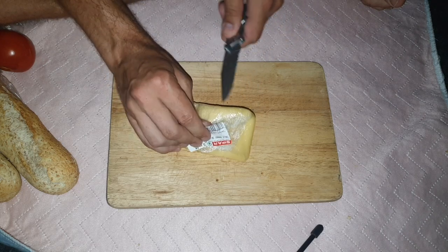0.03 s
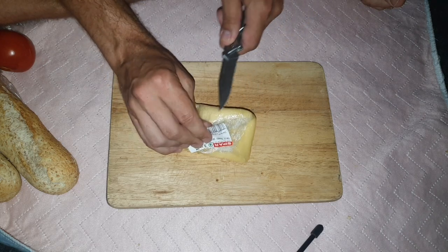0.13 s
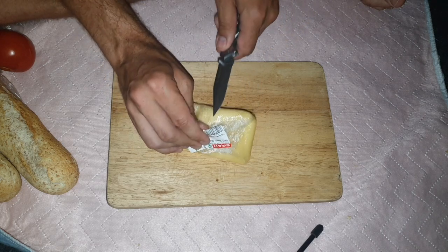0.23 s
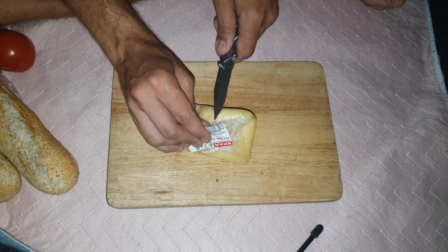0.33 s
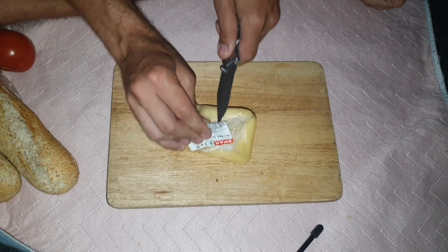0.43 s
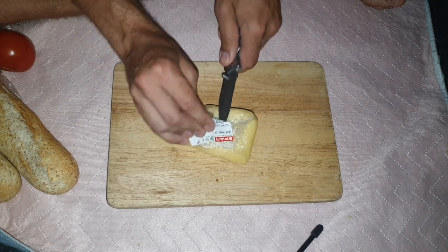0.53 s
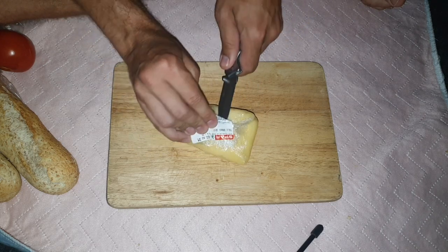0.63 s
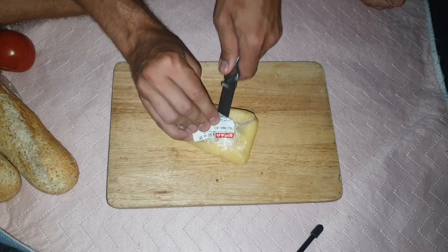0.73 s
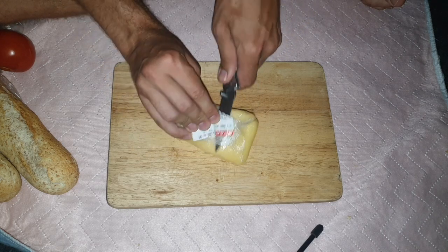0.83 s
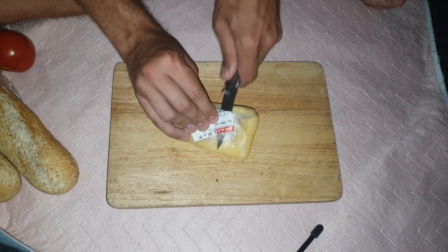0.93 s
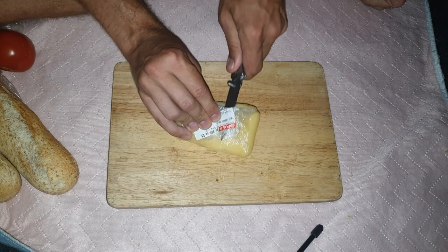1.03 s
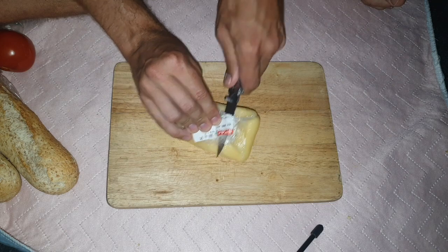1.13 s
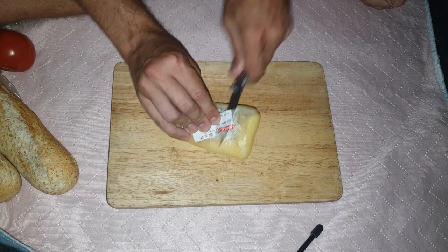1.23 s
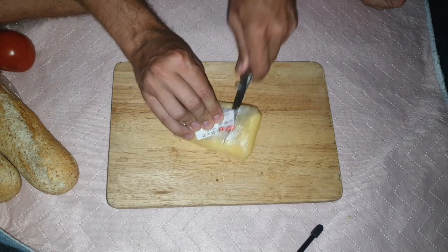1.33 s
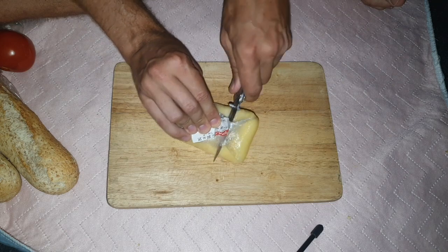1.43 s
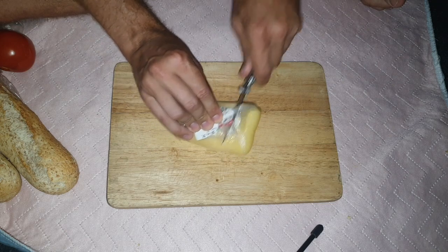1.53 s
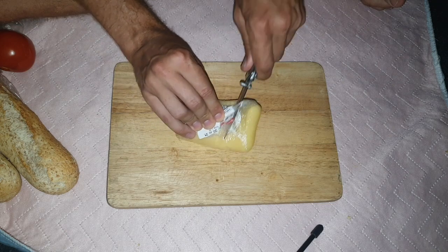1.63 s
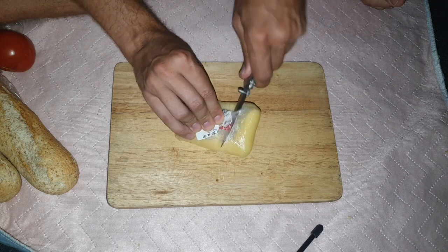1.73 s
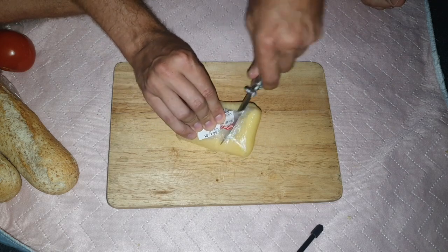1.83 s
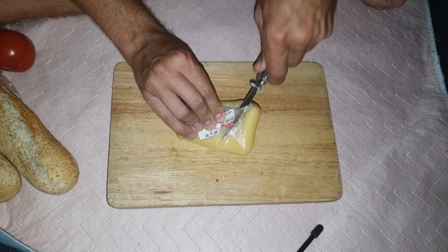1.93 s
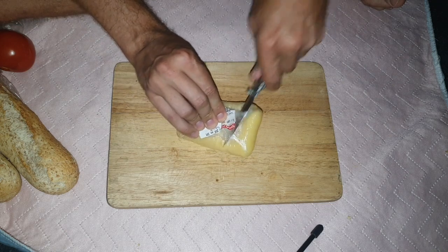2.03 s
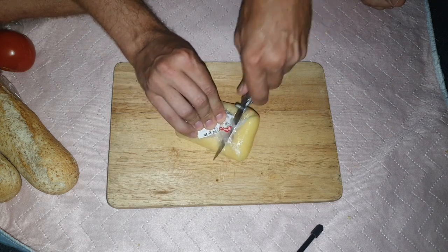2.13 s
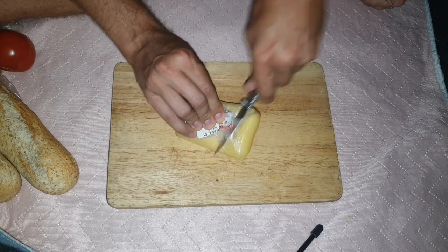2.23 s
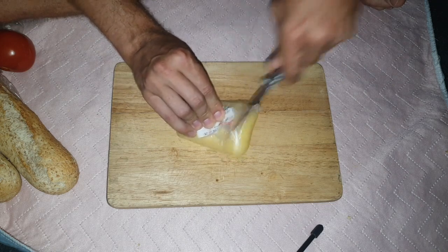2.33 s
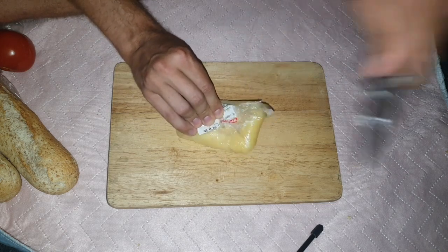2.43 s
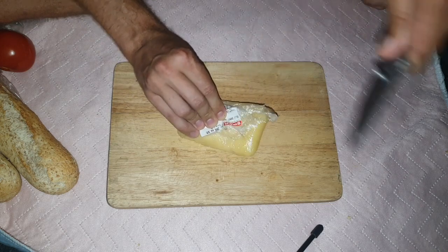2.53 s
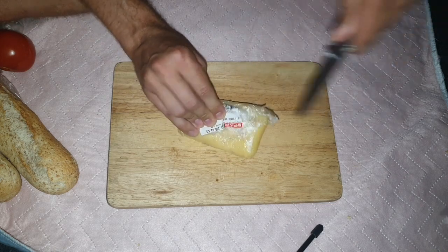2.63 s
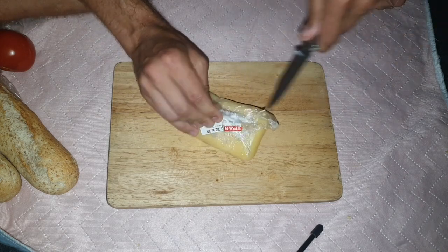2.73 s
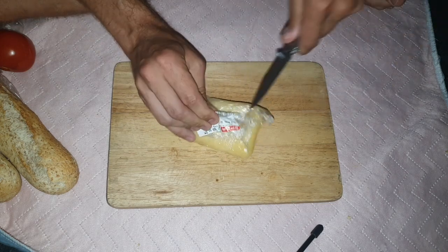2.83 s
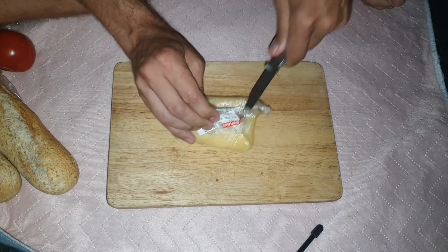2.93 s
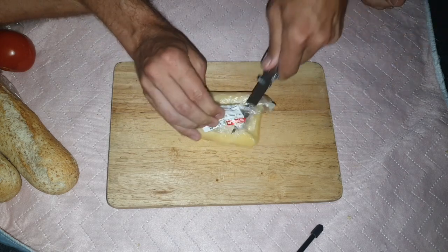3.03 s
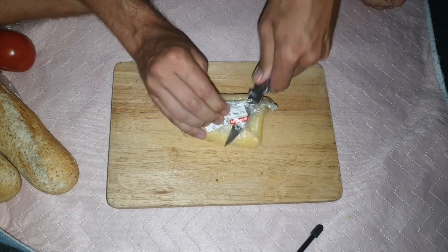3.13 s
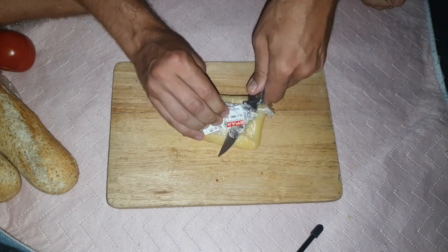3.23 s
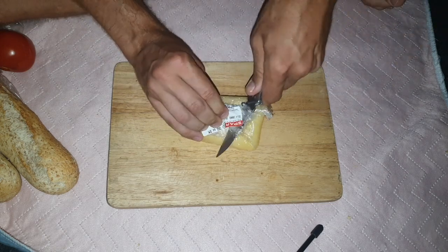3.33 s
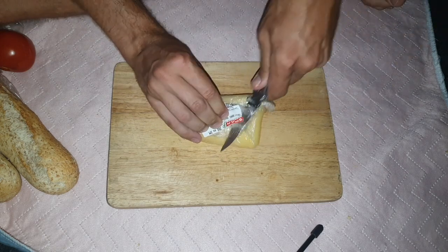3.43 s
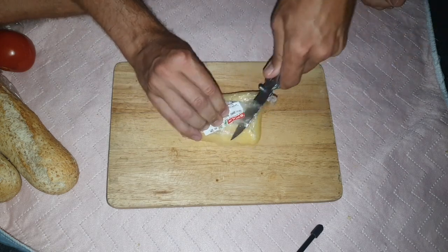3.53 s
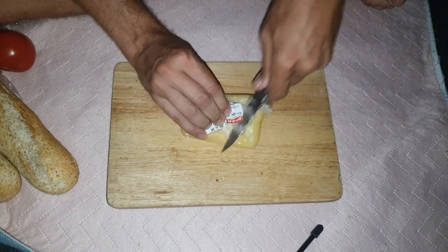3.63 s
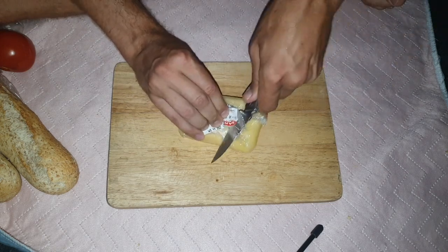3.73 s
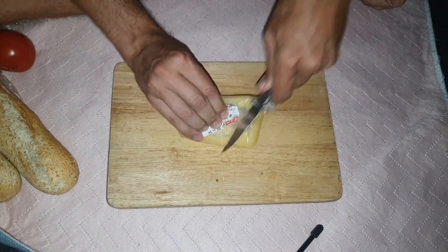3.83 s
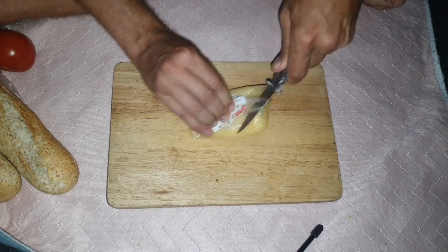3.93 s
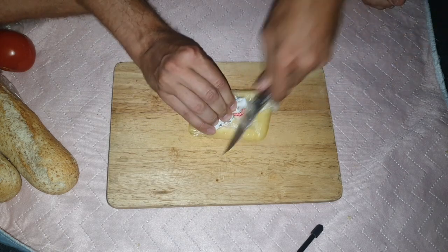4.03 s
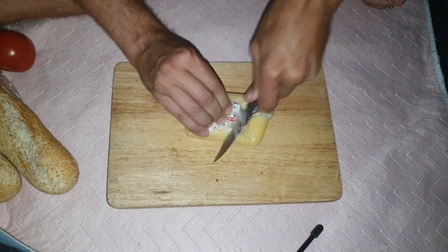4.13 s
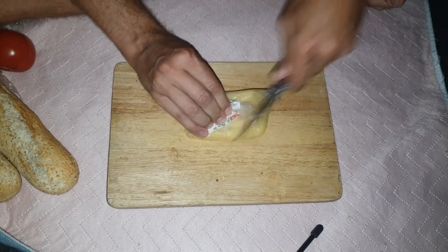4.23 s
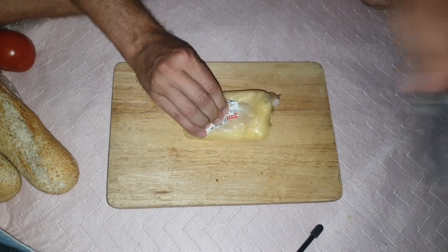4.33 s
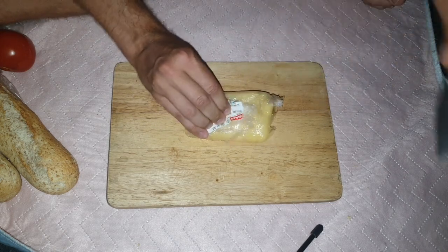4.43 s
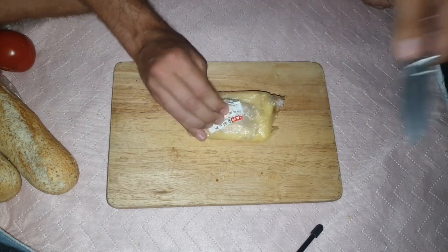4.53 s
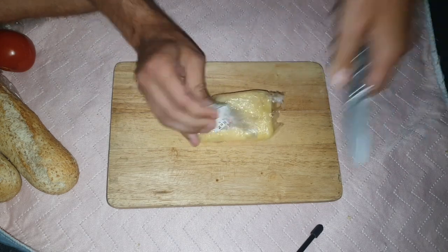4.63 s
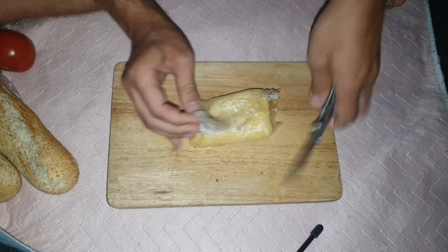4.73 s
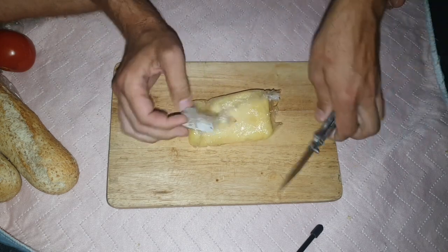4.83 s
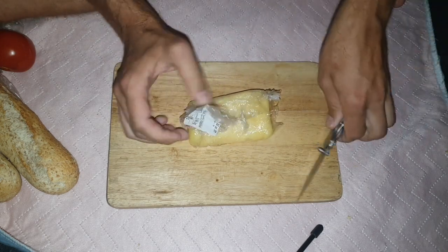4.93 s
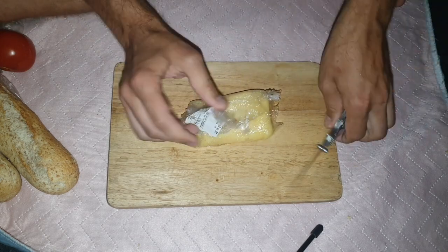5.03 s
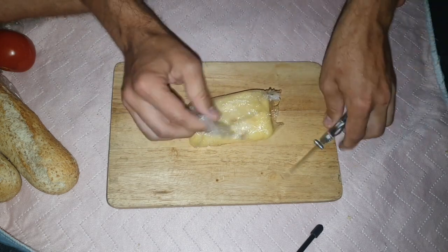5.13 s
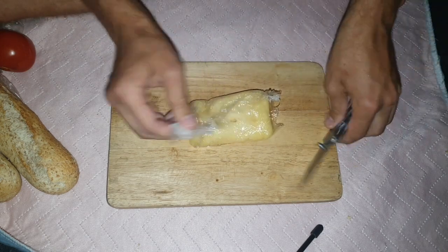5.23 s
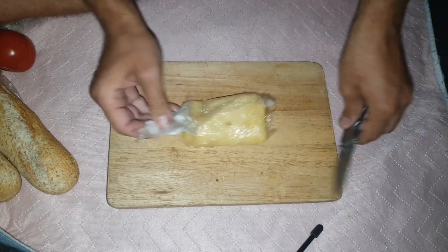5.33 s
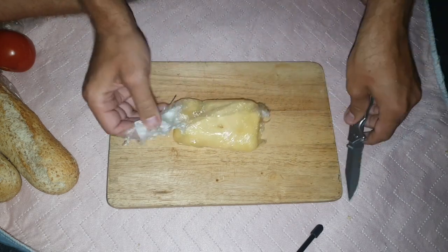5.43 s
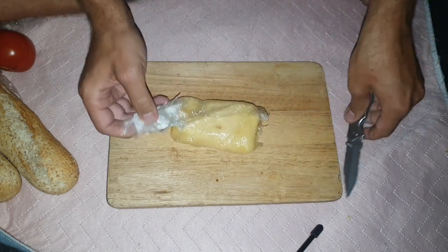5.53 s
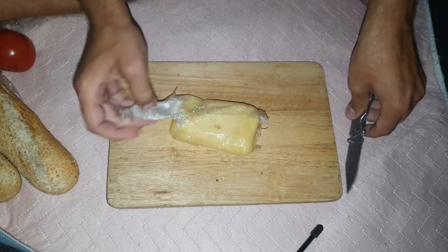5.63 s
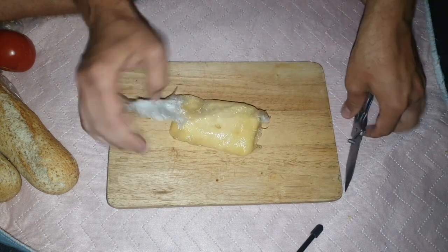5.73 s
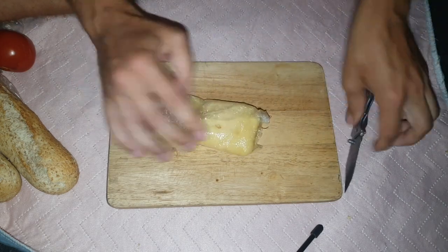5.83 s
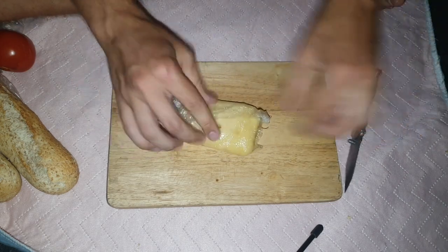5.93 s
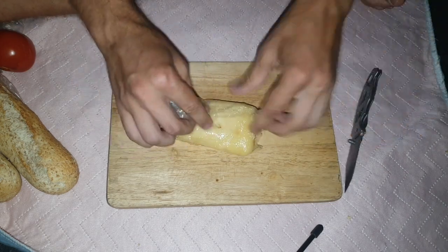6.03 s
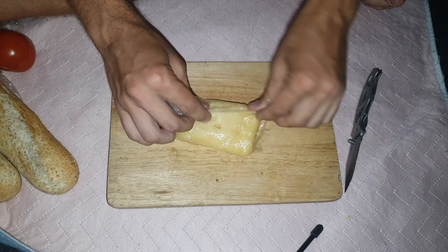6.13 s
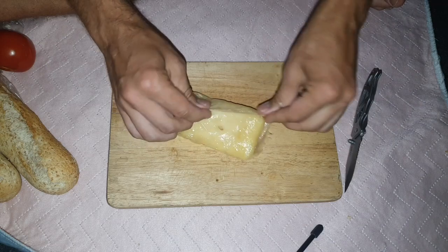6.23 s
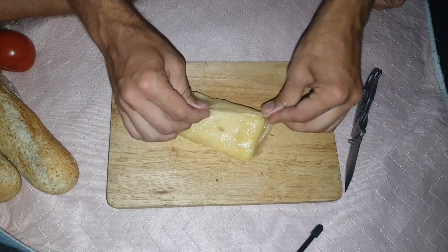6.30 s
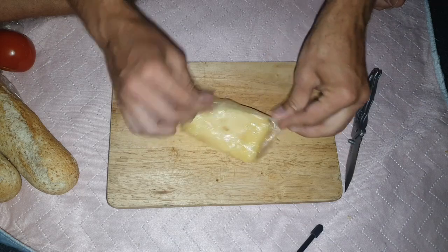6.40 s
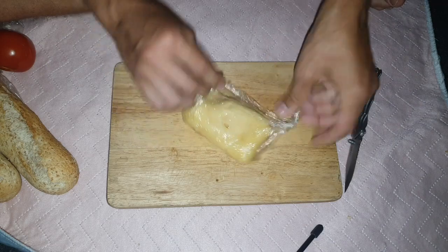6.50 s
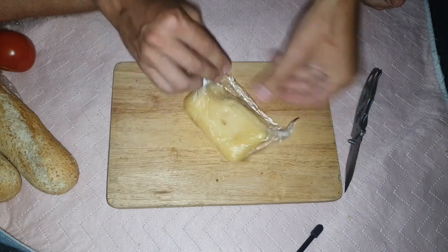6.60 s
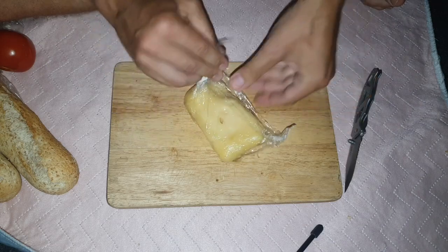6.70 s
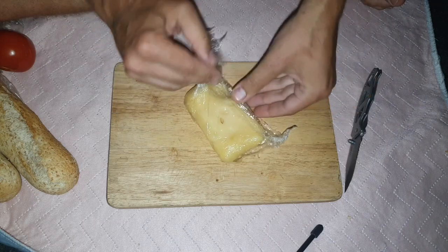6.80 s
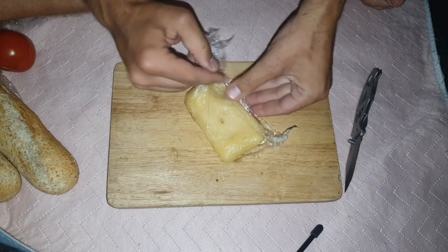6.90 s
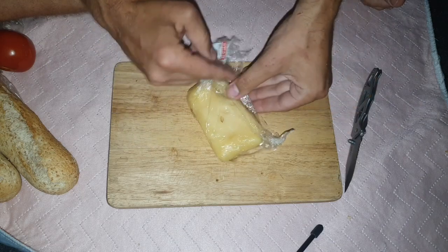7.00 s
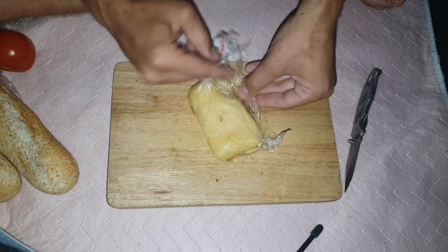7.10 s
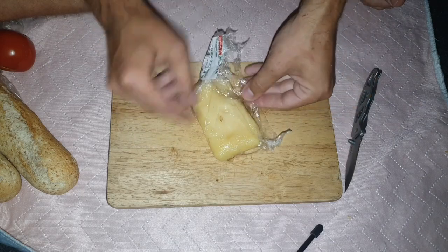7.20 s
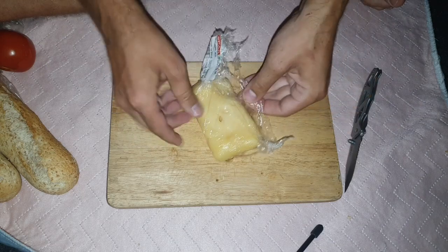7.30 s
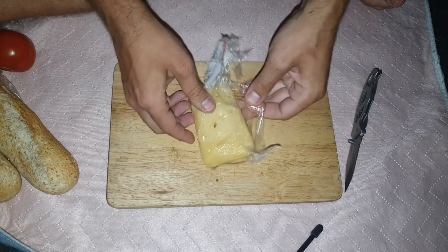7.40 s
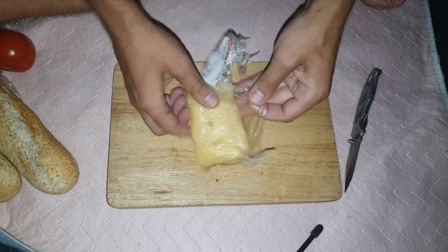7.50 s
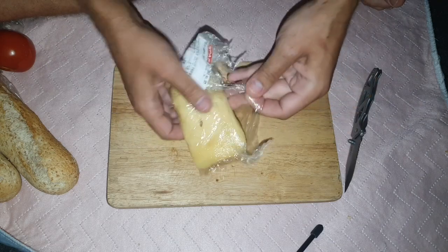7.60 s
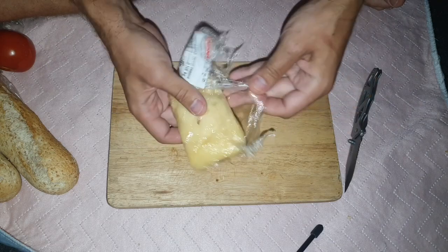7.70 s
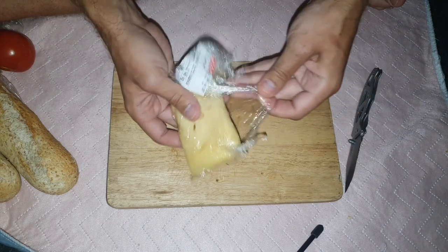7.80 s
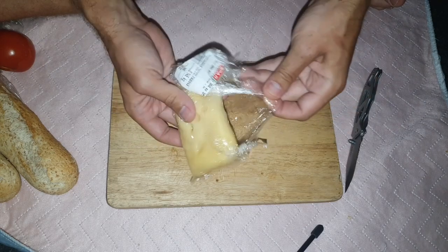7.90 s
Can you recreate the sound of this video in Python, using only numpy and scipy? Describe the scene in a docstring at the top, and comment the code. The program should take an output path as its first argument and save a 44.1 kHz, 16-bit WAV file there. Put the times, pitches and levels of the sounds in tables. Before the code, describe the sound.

Inside a parked car with a constant low rumble, a knife works at plastic wrap on cheese, close to the microphone. Faint scrapes, crisp ticks and hissy crinkles lead to two short, loud rips, each with a dull boom. A few quick knocks of the knife tip on a wooden board follow. Then gentler rustling continues as fingers pull the wrap off, and the cheese tips over with a soft scuff.

```python
"""Cling film rustles, crackles and hisses as a knife slits it and fingers peel it off a piece of cheese.
Single creases snap as they flip over, and twice the blade rips through the tight film. Later the knife
tip clatters on the wooden board, and the cheese tips over with a soft scuff. All this is in a parked car:
the small cabin adds short echoes, booms low when the board is jolted and rumbles all the while."""
import sys
import numpy as np
from scipy import signal
from scipy.fft import rfft, irfft, next_fast_len
from scipy.io import wavfile
from scipy.ndimage import map_coordinates

SR = 44100
rng = np.random.default_rng(int(sys.argv[2]) if len(sys.argv) > 2 else 0)


def write(x):
    x = np.atleast_2d(x).T
    wavfile.write(sys.argv[1], SR, np.round(np.clip(x, -1, 1) * 32767).astype(np.int16))


N = 350947
TIME = np.arange(N) / SR

# The tone of each noise, from bass to treble. Each row: frequency in Hz, boost or cut in dB.
RUMBLE_TONE = [(20, -9.5), (40, -8.5), (61, 1), (80, -5.5), (115, -18.5), (160, -12.5), (215, -21),
               (280, -23), (340, -31.5), (620, -34), (950, -30.5), (1400, -38), (2500, -54), (3400, -37.5),
               (4500, -55), (15000, -72.5)]
SCUFF_TONE = [(100, -1), (280, -17), (430, 0), (600, -17), (1000, -20), (2000, -34), (8000, -57)]
RUB_TONE = [(200, -16.5), (450, 3), (1000, 1.5), (1800, 0), (3000, -8), (6000, -20.5), (16000, -39)]
CRACKLE_TONE = [(500, -41), (1500, -13.5), (2300, -6.5), (3100, 2.5), (3700, 1), (4400, -7), (6200, -11.5),
                (7500, -19.5), (16000, -41)]
HISS_TONE = [(500, -13), (1500, -1), (2200, -1.5), (3500, 4), (6200, 2), (7600, -1), (9300, 0.5),
             (12000, -1.5), (15800, -8)]
RIP_TONE = [(300, -8), (800, -4.5), (1400, -5), (2200, -0.5), (3500, 0.5), (5500, -1), (7500, -6),
            (10000, -6.5), (15800, -12.5)]
# The tone of the two microphone openings. Each row: frequency in Hz, left minus right in dB.
LEFT_RIGHT_TONE = [(60, 0.5), (200, -1.7), (400, 1), (1300, 0.5), (2400, 6), (4400, -3), (8100, -4),
                   (15000, -3.5)]
# Jolts of the board that make the cabin boom. Each row: start in seconds, level in dB.
BOARD_JOLTS = [(2.28, -34), (2.317, -16.5), (2.403, -29), (4.186, -16.5), (5.089, -23.5), (7.243, -24)]
# The cheese tips over. Each row: start in seconds, length in seconds, level in dB.
CHEESE_TIPS = [(7.234, 0.028, -43)]
# The knife tip drags over the wood. Each row: start in seconds, length in seconds, level in dB.
TIP_DRAGS = [(5.215, 0.022, -34)]
# The notes that board and blade ring with. Each row: pitch in Hz, level in dB, seconds to fade by 60 dB.
BOARD_NOTES = [(138, -5, 0.096), (210, -19, 0.071), (282.4, -4.5, 0.13), (373, -4.5, 0.037),
               (416, 1.5, 0.092), (502, 2, 0.07), (613, -5, 0.085), (775, -8, 0.084), (872, -3, 0.045),
               (1015, -7.5, 0.077), (1120, -17, 0.017), (1395, -17, 0.11), (1590, -12, 0.036),
               (1823, -11.5, 0.059), (2110, -34, 0.024), (2365, -13, 0.013), (2820, -3, 0.02),
               (3085, 8.5, 0.015), (3470, -11, 0.091), (3630, -14, .04), (4300, -24, .04),
               (5100, -20, 0.029)]
BLADE_NOTES = [(1702, -5.5, 0.12), (1810, -26, .07), (3230, -9.5, 0.044)]
# The knife bounces on the board. Each row: start in seconds, then the levels in dB of the low body,
# middle clack, high tick and blade ring, then the pitch in Hz that the struck spot favours.
KNIFE_KNOCKS = [(4.7553, -32, -22.5, -41, -35, 850), (4.926, -27, -17.5, -26, -55, 1015),
                (4.9372, -29.5, -22.5, -37, -49, 514), (5.0780, -16, -14, -25, -24, 420),
                (5.0838, -31, -19, -24, -46, 870), (5.095, -25, -20.5, -38, -46, 420),
                (5.2787, -20, -21, -28, -27, 385), (5.2809, -20, -17, -21.5, -35, 620),
                (5.2938, -31, -29, -32, -31, 1015), (5.3067, -30.5, -21.5, -31, -34, 617),
                (5.3150, -40, -28.5, -34, -34, 3110), (5.3260, -37, -33, -49, -46, 620)]
# The blade scrapes tight film. Each row: start in seconds, length in seconds, level in dB, pitch in Hz.
BLADE_SCRAPES = [(0.728, .025, -47, 3300), (0.778, .04, -51, 3370), (0.857, 0.093, -49.5, 3400),
                 (1, 0.12, -48, 3400), (1.166, 0.023, -47, 3470), (1.284, 0.12, -55, 3280),
                 (3.008, 0.11, -52, 2580), (3.285, .05, -52.5, 2770)]
# Resting fingers never keep quite still. Each row: time in seconds, rub level in dB, rustle level in dB.
FINGER_GRIP = [(0.0, -50, -74), (0.38, -55.5, -70), (0.65, -53.5, -58.5), (1.5, -59.5, -61),
               (1.75, -56, -63), (2.5, -60.5, -58), (2.87, -59, -65), (3.3, -63, -62), (3.8, -62.5, -50),
               (4.55, -56, -57), (4.8, -63, -69), (5.05, -64, -70), (5.45, -59.5, -62.5),
               (5.85, -66.5, -75.5), (6.3, -53.5, -54), (6.6, -59.5, -65.5), (7.15, -60.5, -75),
               (7.3, -53.5, -53), (7.95, -61, -54)]
# Fingers slide on the wrapped cheese. Each row: start in seconds, length in seconds, level in dB.
FINGER_SLIDES = [(0.435, 0.023, -49), (2.272, 0.0078, -35), (3.445, 0.019, -49), (3.975, 0.035, -59),
                 (4.43, 0.058, -56), (5.115, .15, -47), (6.07, 0.075, -53), (6.35, .17, -55),
                 (7.232, 0.034, -44), (7.688, 0.036, -50.5)]
# Tugs on the film. Each row: start in seconds, length in seconds, crackle level in dB, hiss level in dB.
FILM_TUGS = [(0.335, 0.075, -55, -75), (0.437, 0.051, -45.5, -54.5), (0.635, 0.14, -47.5, -56),
             (0.78, 0.025, -39, -46.5), (0.855, 0.081, -46.5, -57), (1.0, 0.13, -43, -48.5),
             (1.14, 0.093, -52, -53), (1.275, 0.1, -43.5, -48), (1.415, 0.095, -47.5, -49),
             (1.595, 0.069, -47.5, -52.5), (1.8, 0.05, -52.5, -57), (1.955, 0.059, -54, -54.5),
             (2.005, .07, -48, -49.5), (2.19, 0.078, -43, -45.5), (2.248, 0.094, -35, -38),
             (2.422, 0.022, -63, -51), (2.53, 0.09, -48.5, -49), (2.635, 0.063, -45.5, -52),
             (2.73, 0.091, -77, -60), (2.935, 0.091, -51.5, -56.5), (3.02, 0.11, -49, -53.5),
             (3.175, 0.037, -54, -53.5), (3.28, 0.11, -55, -54.5), (3.37, 0.13, -48.5, -47),
             (3.535, .12, -44, -44.5), (3.725, 0.15, -54, -45.5), (3.935, 0.12, -49, -43.5),
             (4.1, 0.079, -42, -42.5), (4.325, 0.071, -57, -49), (4.405, 0.085, -42.5, -47),
             (4.57, 0.053, -53, -53), (5.12, 0.16, -48.5, -50), (5.29, 0.088, -55.5, -58),
             (5.48, 0.13, -60, -66), (5.635, 0.07, -56, -61), (6.02, 0.15, -51, -48),
             (6.315, 0.15, -53.5, -50.5), (6.66, 0.053, -56.5, -67), (6.88, 0.036, -62, -53),
             (7.02, 0.07, -61, -60.5), (7.182, 0.078, -52.5, -51), (7.265, 0.042, -42.5, -49.5),
             (7.39, .04, -64, -53), (7.465, 0.076, -51.5, -48.5), (7.66, 0.099, -45.5, -47),
             (7.8, 0.061, -64, -53)]
# The blade rips through. Each row: time the film parts in seconds, seconds at full strength,
# level in dB, build-up before it parts in dB per second.
FILM_RIPS = [(2.31, 0.0063, -23.5, 520), (4.184, 0.024, -24, 1400)]
# Single creases snap. Each row: start in seconds, level in dB, pitch in Hz.
CREASE_SNAPS = [(0.437, -19.5, 2600), (0.4405, -26, 2500), (.459, -30, 2500), (.645, -30, 3100),
                (.7375, -25.5, 3200), (.787, -29, 3420), (.872, -28.5, 3340), (1.004, -31, 3320),
                (1.179, -26.5, 3600), (1.4957, -21, 3600), (2.187, -30, 3200), (2.2485, -22, 3240),
                (2.276, -16, 2880), (2.3083, -6.5, 2500), (2.3169, -2.5, 3100), (2.539, -32, 3050),
                (2.6545, -28.5, 3040), (3.0357, -28.5, 2580), (3.363, -26, 3850), (3.436, -26, 3200),
                (3.452, -19.5, 2950), (3.592, -24.5, 3000), (3.6366, -11, 2930), (3.639, -9, 3160),
                (3.72, -16.5, 3200), (3.7474, -20.5, 3340), (3.876, -20.5, 3180), (4.100, -24, 3220),
                (4.1736, -12.5, 3450), (4.1868, -2.5, 3600), (4.501, -21, 3330), (5.136, -22, 3340),
                (5.641, -33, 3000), (5.690, -36, 3320), (6.372, -30.5, 3250), (6.505, -28, 4100),
                (7.249, -41, 1410), (7.701, -27, 1470), (7.932, -31, 3420)]


def amp(db):
    """Turn decibels into a number to multiply a sound by."""
    return 10 ** (np.asarray(db) / 20)


def unit(x):
    """Scale a signal so that its average strength (rms) is 1."""
    return x / np.sqrt(np.mean(x ** 2))


def add(out, start, sound):
    """Mix a sound in at a start time in seconds."""
    i = max(int(start * SR), 0)
    out[..., i:i + sound.shape[-1]] += sound[..., :N - i]


def band(x, hz, kind, order=2):
    """Keep only the lows, the highs or a band in between."""
    return signal.sosfilt(signal.butter(order, np.minimum(hz, SR / 2 - 1), kind, fs=SR, output="sos"), x)


def colour(x, tone, share=1):
    """Shape bass and treble by a tone table, with its dB values multiplied by share."""
    hz, db = np.transpose(tone)
    size = next_fast_len(N + 8192, True)
    freqs = np.maximum(np.arange(size // 2 + 1) * SR / size, 1)
    gain = amp(share * np.interp(np.log(freqs), np.log(hz), db))
    # folding the cepstrum makes the filter ring after a click, never before it
    cepstrum = irfft(np.log(gain), size)
    cepstrum[1:size // 2] *= 2
    cepstrum[size // 2 + 1:] = 0
    return irfft(rfft(x, size) * np.exp(rfft(cepstrum)), size)[..., :N]


def wander(per_s):
    """A curve of size about 1 that glides from one random value to the next."""
    values = rng.standard_normal(8192)
    return unit(map_coordinates(values, [TIME * per_s], order=1, mode="wrap"))


def slips(per_s, spread_db, bunch_db, bunches_per_s):
    """Tiny slips and buckles: random clicks of very unequal size, louder in bunches."""
    hits = rng.random(N) < per_s / SR
    sizes = amp(spread_db * np.minimum(rng.exponential(size=N), 5))
    signs = rng.choice([-1, 1], N)
    return unit(hits * sizes * signs * amp(bunch_db * wander(bunches_per_s)))


def level_curve(rows, column):
    """Loudness that glides along one dB column of a table, silent outside its times."""
    rows = np.array(rows)
    return amp(np.interp(TIME, rows[:, 0], rows[:, column], left=-150, right=-150))


def strokes(rows, column=2, attack_share=0.17, arch_db=2.5, release_s=0.021, lead_s=0.1):
    """Loudness of strokes that swell, arch and die away; longer ones swell more gently."""
    power, t = np.zeros(N), TIME[:SR // 2] - lead_s
    for row in rows:
        start, length = row[0], max(row[1], 0.005)
        attack = 0.5 + 0.5 * np.tanh(t / (attack_share * length))
        arch = amp(-arch_db * (2 * np.clip(t / length, 0, 1) - 1) ** 2)
        release = np.exp(-np.maximum(t - length, 0) / release_s)
        add(power, start - lead_s, (amp(row[column]) * attack * arch * release) ** 2)
    return np.sqrt(power)


def cabin_echoes(x, early_db, early_s, tail_db, tail_s):
    """Add early echoes from board and windows and a tail kept short by the seats, in stereo."""
    t = TIME[:SR // 5]
    onset = np.clip(t / 0.0011 - 1, 0, 1)
    early = onset * np.exp(-t / early_s)
    tail = onset * amp(-60 * t / tail_s)
    decay = sum((amp(db) * h) ** 2 / np.sum(h ** 2) for h, db in ((early, early_db), (tail, tail_db)))
    # each click comes from another spot, so its echoes keep their energy but never their pattern
    energy = np.maximum(signal.oaconvolve(x ** 2, decay)[:len(x)], 0)
    return x + np.sqrt(energy) * rng.standard_normal((2, len(x)))


def echo_once(sound, **room):
    """Give one short sound its own set of cabin echoes."""
    echoes = cabin_echoes(signal.unit_impulse(SR // 6), **room)
    return signal.fftconvolve(sound[None], echoes, axes=1)


def cabin_rumble(level_db=-45, apart_hz=650):
    """The cabin's air rumbles: alike in both ears in the bass, more spread out higher up."""
    middle, side = rng.standard_normal((2, N))
    side = band(side, apart_hz, "highpass", order=1) * amp(-1.5)
    air = colour(np.array([middle + side, middle - side]), RUMBLE_TONE)
    return amp(level_db) * unit(band(air, 24, "highpass"))


def cabin_boom(hz=61, rise_s=0.019, tail_db=-17, tail_s=0.051):
    """A jolt of the board stirs the lowest note of the cabin's air, which swells and dies away."""
    out, t = np.zeros(N), TIME[:SR // 2]
    age = t / rise_s
    swell = age ** 2 * np.exp(2 - 2 * age)
    tail = amp(tail_db) * t / tail_s * np.exp(1 - t / tail_s)
    for start, db in BOARD_JOLTS:
        add(out, start, amp(db) * (swell + tail) * np.sin(2 * np.pi * hz * t))
    return out


def cheese_scuff():
    """The soft block tips over and shuffles on the board with a dull, padded scuff."""
    return unit(colour(rng.standard_normal(N), SCUFF_TONE)) * strokes(CHEESE_TIPS)


def tip_drag(catches_per_s=425):
    """The knife tip catches on the grain and stutters: a short wooden groan."""
    count = np.cumsum(catches_per_s * (1 + 0.07 * wander(300))) / SR
    # one click each time the count passes a whole number
    catches = np.diff(np.floor(count), prepend=0) * amp(2.5 * wander(400))
    groan = band(catches, [340, 540], "bandpass", order=1)
    return unit(band(groan, 900, "lowpass", order=1)) * strokes(TIP_DRAGS)


def ring(notes, t):
    """The fading notes of a struck thing, one row each; no two blows ring quite alike."""
    hz, db, fade_s = np.transpose(notes)[:, :, None]
    stray_db, detune = rng.standard_normal((2, len(notes), 1))
    return amp(db + stray_db - 60 * t / fade_s) * np.sin(2 * np.pi * hz * (1 + 0.005 * detune) * t)


def knife_knocks(body_below_hz=560, tick_above_hz=2200, favour_db=6, crack_s=0.0052):
    """Each knock makes the board and the blade ring over a short woody crack."""
    out, t = np.zeros((2, N)), TIME[:SR // 3]
    hz = np.array(BOARD_NOTES)[:, 0]
    signs = (-1) ** np.arange(len(hz))
    for start, body_db, clack_db, tick_db, blade_db, spot_hz in KNIFE_KNOCKS:
        push_db = np.where(hz < body_below_hz, body_db, np.where(hz < tick_above_hz, clack_db, tick_db))
        push_db = push_db + favour_db * np.exp(-(np.log(hz / spot_hz) / 0.07) ** 2)
        grit = rng.standard_normal(len(t)) * np.exp(-t / crack_s)
        clack = amp(clack_db) * band(grit, [150, 1900], "bandpass", order=3)
        tick = amp(tick_db) * band(grit, [2500, 4000], "bandpass", order=3)
        board = (amp(push_db - 7) * signs) @ ring(BOARD_NOTES, t)
        blade = amp(blade_db) * ring(BLADE_NOTES, t).sum(0)
        knock = band(board + amp(0.5) * (clack + tick) + blade, [90, 5000], "bandpass")
        add(out, start, echo_once(knock, early_db=-5, early_s=0.004, tail_db=-14, tail_s=0.1))
    return out


def blade_scrapes(width_hz=480):
    """Quick slips of the edge ring a stretched patch of film; the tighter it is, the higher it rings."""
    starts, _, _, hz = np.transpose(BLADE_SCRAPES)
    clicks = slips(per_s=840, spread_db=2.5, bunch_db=0.5, bunches_per_s=160)
    clicks = cabin_echoes(clicks, early_db=-6, early_s=0.0027, tail_db=-13, tail_s=0.1)
    # shift the pitch down to zero, keep the lows, shift back: a ring that follows the pitch
    shift = np.exp(2j * np.pi * np.cumsum(np.interp(TIME, starts, hz)) / SR)
    ringing = (band(clicks / shift, width_hz / 2, "lowpass") * shift).real
    return unit(ringing) * strokes(BLADE_SCRAPES)


def crease_snaps(rise_cycles=0.59, edge_db=-19, edge_db_per_octave=18, middle_hz=3000):
    """A crease flips and swings once or twice; tighter film rings higher, with a sharper edge."""
    out, t = np.zeros((2, N)), TIME[:400]
    for start, db, hz in CREASE_SNAPS:
        age = t * hz / rise_cycles
        swell = age ** 2 * np.exp(2 - 2 * age)
        sharpness = amp(edge_db + edge_db_per_octave * np.log2(hz / middle_hz))
        edge = sharpness * band(swell * rng.standard_normal(len(t)), 3600, "highpass")
        swing = swell * np.sin(2 * np.pi * hz * t)
        click = amp(db) * band(swing + edge, 1100, "highpass", order=1)
        add(out, start, echo_once(click, early_db=-7, early_s=0.0023, tail_db=-3, tail_s=0.073))
    return out


def film_noise(clicks, loudness, tone, early_db):
    """A stream of clicks, echoed by the cabin and given its tone by the film."""
    tone_gain = np.std(colour(rng.standard_normal(N), tone))
    echoed = cabin_echoes(clicks * loudness, early_db=early_db, early_s=0.001, tail_db=-7, tail_s=0.087)
    return colour(echoed, tone) / tone_gain / np.sqrt(2 + amp(early_db) ** 2)


def finger_rub(stretch, tug_db=-10):
    """Fingers rub the film in tiny slips as they hold, slide and tug."""
    grip = level_curve(FINGER_GRIP, column=1)
    pressure = np.sqrt(grip ** 2 + strokes(FINGER_SLIDES) ** 2 + (amp(tug_db) * stretch) ** 2)
    clicks = slips(per_s=2000, spread_db=2.5, bunch_db=1, bunches_per_s=70)
    return film_noise(clicks, pressure, RUB_TONE, early_db=4.5)


def film_crackle(rustle, held_db=-1):
    """Small creases buckle as the film is tugged or just held."""
    buckles = slips(per_s=450, spread_db=3.3, bunch_db=1.5, bunches_per_s=140)
    loudness = np.hypot(strokes(FILM_TUGS, column=2), amp(held_db) * rustle)
    return film_noise(buckles, loudness, CRACKLE_TONE, early_db=-1)


def film_hiss(stretch, rustle):
    """Stretched film unsticks from itself with a fine hiss."""
    clicks = slips(per_s=2600, spread_db=3.1, bunch_db=1.5, bunches_per_s=140)
    return film_noise(clicks, np.hypot(stretch, rustle), HISS_TONE, early_db=11.5)


def film_rips(fall_db_per_s=700):
    """A tear builds up, runs through and stops as the film goes slack."""
    loudness = np.zeros(N)
    for parts_at, length, db, build_db_per_s in FILM_RIPS:
        before = np.maximum(parts_at - TIME, 0)
        after = np.maximum(TIME - parts_at - length, 0)
        loudness += amp(db - build_db_per_s * before - fall_db_per_s * after)
    clicks = slips(per_s=7700, spread_db=2.5, bunch_db=2, bunches_per_s=340)
    return film_noise(clicks, loudness, RIP_TONE, early_db=11.5)


def cling_film(level_db=-1.16):
    """The handled film rubs, crackles, hisses and rips."""
    rustle = level_curve(FINGER_GRIP, column=2)
    stretch = strokes(FILM_TUGS, column=3)
    sound = finger_rub(stretch) + film_crackle(rustle) + film_hiss(stretch, rustle) + film_rips()
    sound = band(sound, 140, "highpass")
    # the surfaces round the microphone add echoes that stay the same
    nearby = cabin_echoes(signal.unit_impulse(SR // 6), early_db=-9, early_s=0.004, tail_db=-11, tail_s=0.1)
    return amp(level_db) * signal.oaconvolve(sound, nearby, axes=1)[:, :N]


def scene():
    """Film, knife, cheese and cabin together."""
    unwrapping = cling_film() + blade_scrapes() + crease_snaps()
    on_board = knife_knocks() + tip_drag() + cheese_scuff()
    return unwrapping + on_board + cabin_boom() + cabin_rumble()


def record(dry, notch_hz=7600, notch_q=6, notch_share=0.51, top_hz=15900):
    """Each microphone opening dulls a narrow treble band and has its own tone; the top is cut steeply."""
    notched = signal.lfilter(*signal.iirnotch(notch_hz, notch_q, SR), dry)
    left, right = dry + notch_share * (notched - dry)
    heard = np.array([colour(left, LEFT_RIGHT_TONE, 0.5), colour(right, LEFT_RIGHT_TONE, -0.5)])
    return signal.sosfilt(signal.ellip(10, 0.1, 80, top_hz, fs=SR, output="sos"), heard)


dry = scene()
out = record(dry)
write(out)
```